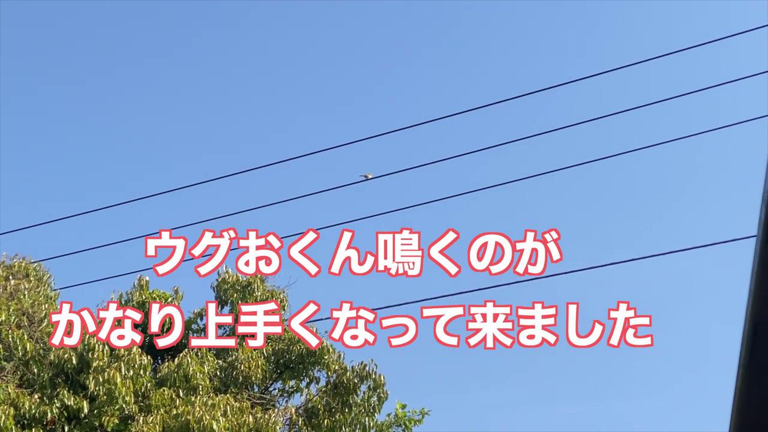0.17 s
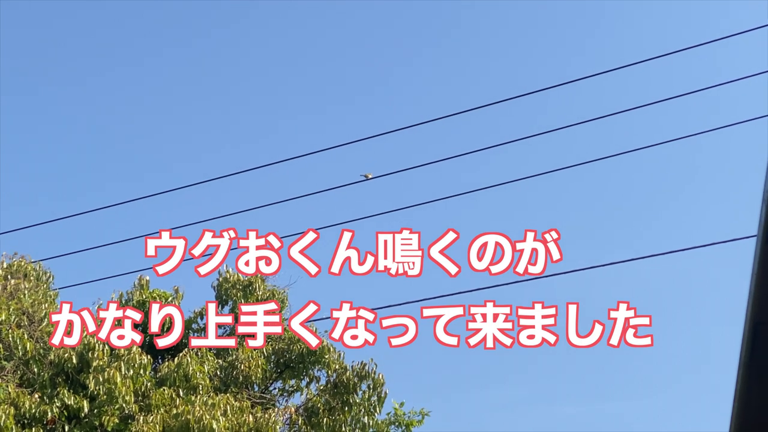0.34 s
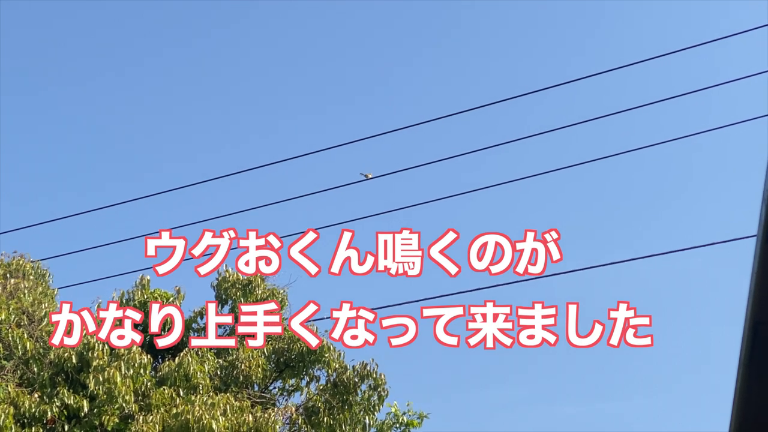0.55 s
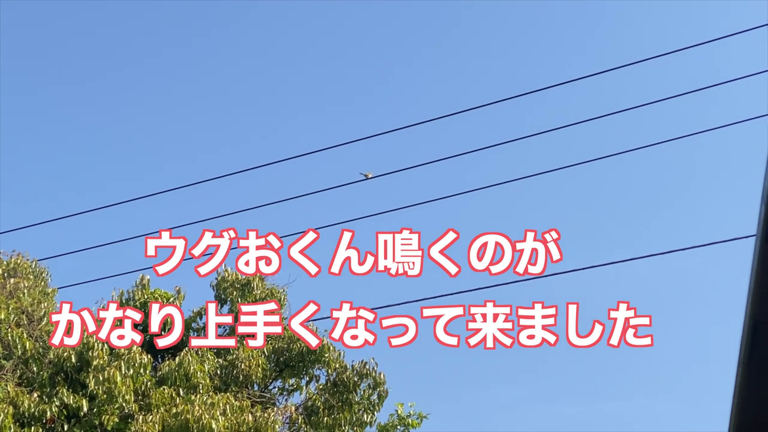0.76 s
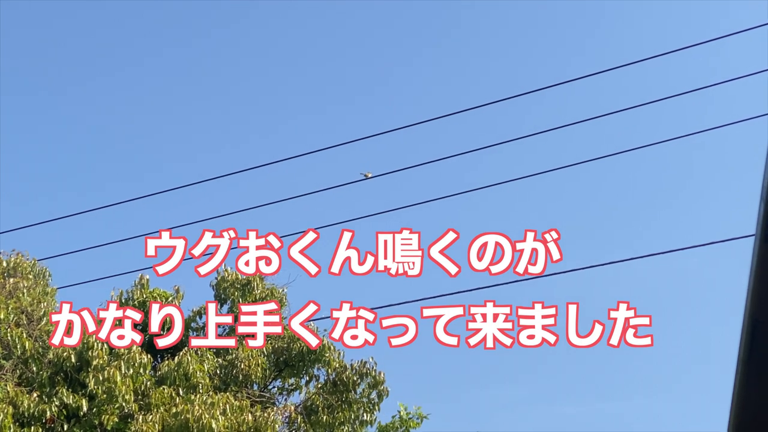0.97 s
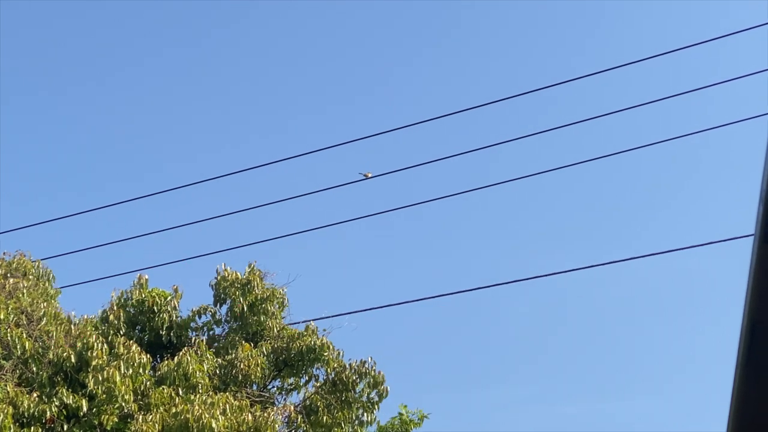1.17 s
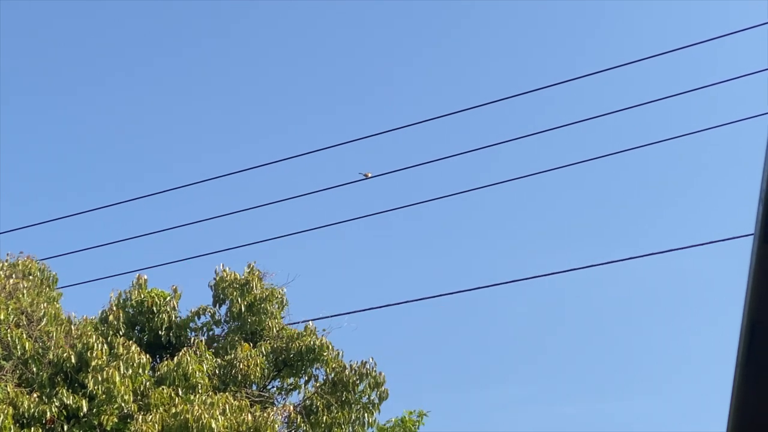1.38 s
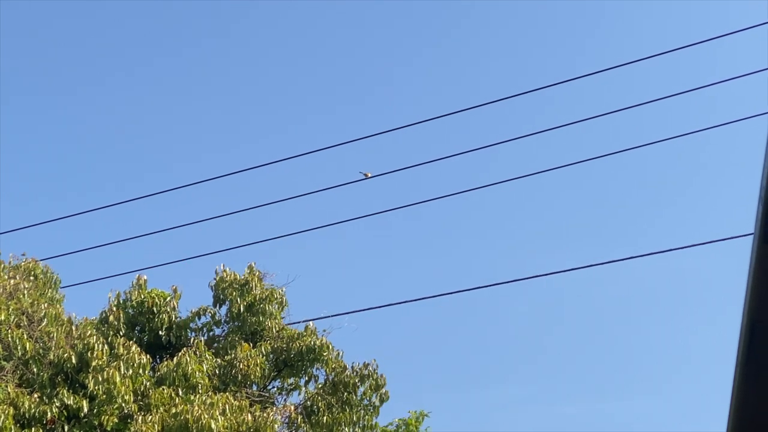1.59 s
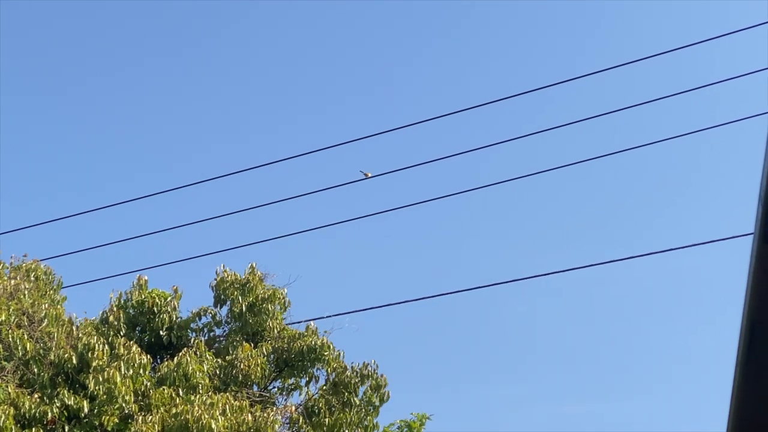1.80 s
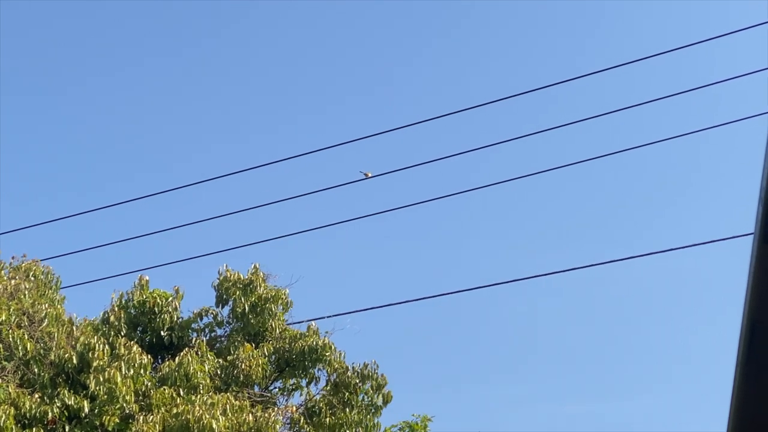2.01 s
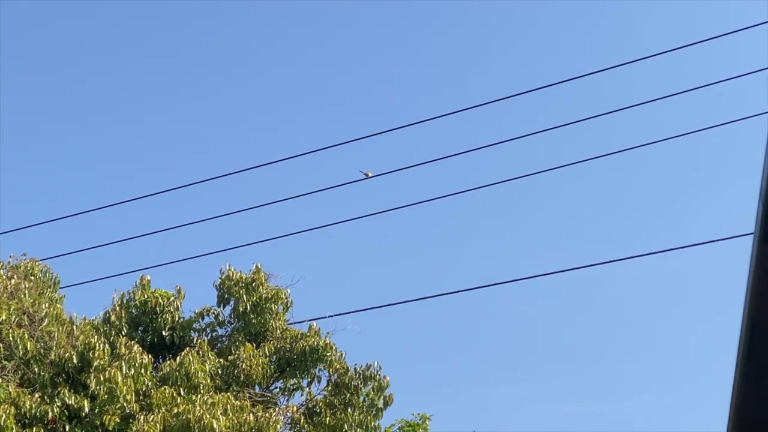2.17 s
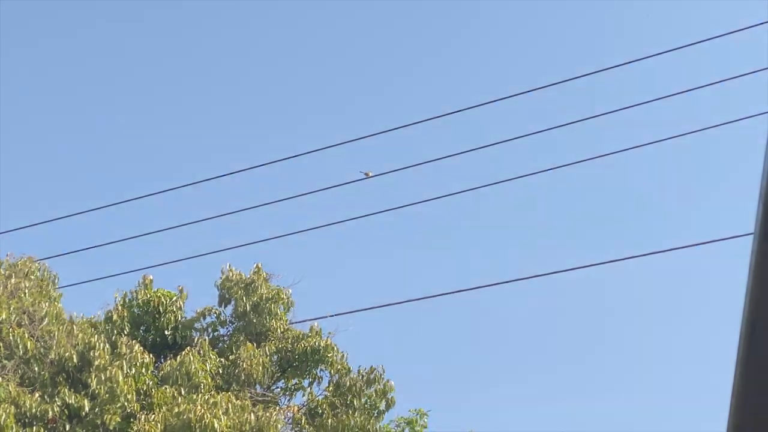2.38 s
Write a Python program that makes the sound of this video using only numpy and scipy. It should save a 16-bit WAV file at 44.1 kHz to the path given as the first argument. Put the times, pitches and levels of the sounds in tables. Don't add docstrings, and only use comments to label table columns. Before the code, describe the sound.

A songbird sings one phrase outdoors. From 0 to 0.75 seconds a pure, low whistle swells, then repeats as five short pulses on nearly one pitch. At about 0.8 a far louder two-part flourish leaps upward, capped by a sharp falling chip near 0.96. Reflections die away; until about 2.4 only faint distant birds, low rumble, soft wind thumps and light leaf hiss remain.

```python
import sys
import numpy as np
from scipy import signal
from scipy.fft import rfft, irfft
from scipy.io import wavfile
from scipy.ndimage import uniform_filter1d

SR = 44100
rng = np.random.default_rng(int(sys.argv[2]) if len(sys.argv) > 2 else 0)


def to_wav(s):
    ch = np.atleast_2d(s).T
    pcm = np.round(np.clip(ch, -1, 1) * 32767)
    wavfile.write(sys.argv[1], SR, pcm.astype(np.int16))


def invert_db(level):
    return 10 ** (np.asarray(level, dtype=float) / 20)


N = 108045

# (time [s], rumble level [dB], gust level [dB], leaf level [dB])
WEATHER = [(0.0, -52, -50.5, -84), (.2, -47.5, -50.5, -84), (0.4, -45.5, -48, -84.5),
           (.6, -53.5, -47.5, -82.5), (0.8, -58, -56.5, -83), (1.0, -57, -56.5, -83),
           (1.22, -56.5, -61, -83), (1.291, -41.5, -54, -82), (1.37, -54, -57.5, -82.5),
           (1.48, -54.5, -54, -82.5), (1.6, -54, -40, -82), (1.72, -53, -44, -81), (1.88, -45, -47, -82),
           (2.02, -50, -47, -81), (2.18, -46.5, -50, -81), (2.3, -62.5, -59, -80.5),
           (2.45, -55, -59.5, -81)]


def evened(x):
    return x / np.sqrt(np.mean(x ** 2) + 1e-20)


def read(points, hz):
    f, value = np.transpose(points)
    return np.interp(np.log(hz + 1), np.log(f + 1), value)


def add(mix, s, sound):
    part = mix[int(round(max(s, 0) * SR)):][:len(sound)]
    part += sound[:len(part)]


def whistle(length, level_db, first_hz, last_hz, bend, swell_db, octave_db, rise_s, fall_s):
    octave_fade_db = 1
    t = np.arange(0, length, 1 / SR)
    u = t / length
    pitch_hz = last_hz + (first_hz - last_hz) * (1 - u) ** bend
    phase = 2 * np.pi * np.cumsum(pitch_hz) / SR
    ramp = np.clip(np.minimum(t / rise_s, (length - t) / fall_s), 0, 1)
    envelope = np.sin(np.pi / 2 * ramp) ** 2 * invert_db(level_db + swell_db(u))
    octave = invert_db(octave_db + octave_fade_db * (u + 0.5)) * np.sin(2 * phase)
    return np.sqrt(2) * envelope * (np.sin(phase) + octave)


def slur(points, overtone_db):
    # (harmonic number [multiple], level [dB])
    overtones = [(2, -42.5), (4, -73), (5, -52), (6, -57.5), (7, -58)]
    beak_hz, beak_width_hz, beak_db = 9160, 260, 19.5
    s, pitch, db = np.transpose(points)
    t = np.arange(s[0], s[-1], 1 / SR)
    hz = uniform_filter1d(np.interp(t, s, pitch), size=90)
    phase = 2 * np.pi * np.cumsum(hz) / SR
    tone = np.sin(phase)
    for k, k_db in overtones:
        lift_db = beak_db / (1 + ((k * hz - beak_hz) / beak_width_hz) ** 2)
        audible = k * hz < 16000
        tone = tone + invert_db(k_db + overtone_db + lift_db) * np.sin(k * phase) * audible
    envelope = uniform_filter1d(np.interp(t, s, invert_db(db)), size=60)
    edges = signal.windows.tukey(len(t), 130 / len(t))
    return s[0], np.sqrt(2) * envelope * tone * edges


def songbird():
    # (start [s], length [s], level [dB], first pitch [Hz], last pitch [Hz])
    pulses = [
        (0.0, 0.18, -44, 952, 964),
        (.211, 0.099, -39.5, 924.4, 983.6),
        (.333, .08, -38, 946, 948),
        (.448, 0.078, -35.5, 960, 951),
        (.56, 0.095, -36.5, 944.6, 948),
        (.682, 0.08, -37.5, 943.6, 944.5),
    ]
    falls_s = [.02, .008, .008, .008, .022, .01]
    # (time [s], pitch [Hz], level [dB])
    arch = [
        (.812, 1400, -65),
        (.82, 1546, -31.5),
        (.83, 1556, -23.5),
        (.84, 1470, -31),
        (.85, 1357, -26.5),
        (.856, 1339, -33.5),
        (.861, 1310, -41),
    ]
    # (time [s], pitch [Hz], level [dB])
    climb = [
        (.862, 1392, -58),
        (.869, 1411, -30),
        (.878, 1563, -24),
        (.89, 1748, -20.5),
        (.902, 1855, -21.5),
        (.914, 1844, -23.5),
        (.921, 1860, -43.5),
        (.926, 1850, -64),
    ]
    # (time [s], pitch [Hz], level [dB])
    chip_path = [
        (.952, 3950, -66),
        (.9545, 3740, -40),
        (.958, 3060, -29),
        (.961, 2670, -26),
        (.964, 2390, -25),
        (.967, 2130, -24),
        (.97, 1930, -27),
        (.973, 1800, -36),
        (.976, 1750, -60),
    ]
    pulse_db, chip_db, chip_overtone_db = 0.2, 2.5, 7.5

    def first_swell(u):
        return 15.5 * (u - 0.7)

    def later_swell(u):
        return -1.5 * (np.sin(np.pi * u) - 0.5)

    out = np.zeros(N)
    for k, (s, *row) in enumerate(pulses):
        swell = later_swell if k else first_swell
        note = whistle(*row, bend=0.61, swell_db=swell, octave_db=-22.5, rise_s=0.008, fall_s=falls_s[k])
        add(out, s, invert_db(pulse_db) * note)
    add(out, *slur(arch, 0))
    add(out, *slur(climb, 0))
    s, chip = slur(chip_path, chip_overtone_db)
    add(out, s, invert_db(chip_db) * chip)
    return out


def noise(spectrum, level_db, patchy_db, size):
    # (frequency [Hz], left-right likeness [0..1])
    likeness = [(60, 0.97), (120, 0.82), (230, 0.89), (440, 0.59), (860, 0.023), (1680, 0.7), (3280, 0.86)]
    # (frequency [Hz], left over right [dB])
    balance = [(60, -2), (230, -1), (860, -0.5), (3280, 0.5)]
    hop = size // 4
    frames, hz = N // hop + 5, np.fft.rfftfreq(size, 1 / SR)
    a, b, c, d, patches = rng.standard_normal((frames, len(hz), 5)).T
    patches = uniform_filter1d(patches, size=5, axis=0)
    patches = evened(uniform_filter1d(patches, size=6, axis=1))
    same = np.clip(read(likeness, hz), -1, 1)[:, None]
    left = a + 1j * b
    right = same * left + np.sqrt(1 - same ** 2) * (c + 1j * d)
    z = np.array([left, right])
    inside = (hz >= spectrum[0][0]) & (hz <= spectrum[-1][0])
    shape = invert_db(read(spectrum, hz)) * inside
    z *= (shape / np.linalg.norm(shape))[:, None]
    z *= invert_db(np.outer([0.5, -0.5], read(balance, hz)))[:, :, None]
    z *= invert_db(level_db(np.arange(frames) * hop / SR, hz[:, None]) + patchy_db * patches)
    return signal.istft(z, nperseg=size, noverlap=size - hop)[1][:, :N]


def town_rumble():
    # (frequency [Hz], density [dB per Hz])
    rumble_spectrum = [(12, -46.5), (25, -36), (35, -12), (52, 13.5), (70, -6), (95, -23.5), (130, -35.5)]
    s, rumble_db, _, _ = np.transpose(WEATHER)
    return noise(rumble_spectrum, lambda t, hz: np.interp(t, s, rumble_db), 0.53, size=2048)


def gusts():
    # (frequency [Hz], density [dB per Hz])
    gust_spectrum = [(50, -26), (85, -27.5), (134, 0.5), (150, -10.5), (184, -12), (247, -9), (318, -13),
                     (377, -22.5), (500, -29), (650, -53.5), (1100, -120)]
    s, _, gust_db, _ = np.transpose(WEATHER)
    return noise(gust_spectrum, lambda t, hz: np.interp(t, s, gust_db), 1.75, size=2048)


def leaf_hiss():
    # (frequency [Hz], density [dB per Hz])
    air_spectrum = [(330, -1), (1000, -1.5), (2000, -14), (4000, -16.5), (7600, -19.5), (8400, -27),
                    (12300, -29), (13100, -38.5)]
    air_db, leaves_mean_db = -54, -81
    treble_hz, low_share, high_share = 5860, 0.037, 3.72
    s, _, _, leaves_db = np.transpose(WEATHER)

    def level_db(t, hz):
        share = low_share + (high_share - low_share) * hz ** 2 / (hz ** 2 + treble_hz ** 2)
        return air_db + share * (np.interp(t, s, leaves_db) - leaves_mean_db)

    return noise(air_spectrum, level_db, 1.7, size=512)


def street(x):
    # (delay [s], level at 1 kHz [dB], level at 3 kHz [dB], left over right [dB])
    echoes = [
        (.0059, -23.5, -1, -2),
        (.0078, -24, -11.5, -12),
        (0.015, -18, -14.5, 5),
        (0.0245, -12.5, -38.5, 5.5),
        (.034, -27.5, -29.5, -3.5),
        (0.044, -27, -19.5, 4),
        (.058, -34, -22.5, 1),
        (.029, -23.5, -31, 7),
        (0.048, -24, -28, -1),
    ]
    # (frequency [Hz], 60 dB decay time [s])
    decay = [(500, 0.94), (1500, 0.34), (2500, 0.26), (4000, 0.42), (9000, 0.18)]
    tail_db, late_db, late_stretch, tail_spread = -12.5, -18.5, 4.25, 1
    tail_bass_db, echo_dull_db = -11, -10
    taps = np.zeros((3, SR))
    at = np.arange(400, SR - 20, 20) + rng.integers(0, 20, (3, (SR - 401) // 20))
    np.put_along_axis(taps, at, rng.choice([-1., 1.], at.shape), 1)
    taps = taps[0] + tail_spread * taps[1:]
    hz, t, z = signal.stft(taps, SR, nperseg=256)
    z = z * invert_db(tail_bass_db * np.clip(2 - hz / 1200, 0, 1))[:, None]
    room = 0
    for db, stretch in ((tail_db, 1), (late_db, late_stretch)):
        fade = invert_db(-60 * t / (read(decay, hz)[:, None] * stretch))
        tail = signal.istft(z * fade, SR, nperseg=256)[1]
        room = room + invert_db(db) * tail / np.linalg.norm(tail[0] + 1e-9)
    for s, low_db, high_db, pan_db in echoes:
        dull_db = high_db + echo_dull_db
        gains_db = np.array([low_db, low_db, (low_db + high_db) / 2, high_db, dull_db, dull_db])
        tap = signal.firwin2(89, [0, 1000, 2000, 2800, 4000, SR / 2], invert_db(gains_db), fs=SR)
        middle = round(s * SR)
        room[:, middle - 44:middle + 45] += tap * invert_db(pan_db * np.array([[0.5], [-0.5]]))
    return signal.fftconvolve(x[None], room, axes=1)[:, :N]


def far_birds():
    # (start [s], length [s], level [dB], first pitch [Hz], last pitch [Hz])
    clear = [
        (.01, .1, -66, 1455, 1430),
        (.468, .105, -58, 3375, 3350),
        (.575, .055, -65, 3350, 3345),
        (.82, .125, -69, 5080, 5050),
        (1.11, .075, -62, 3450, 3250),
        (2.178, .09, -65, 3570, 3500),
        (2.35, .12, -66, 3950, 5450),
        (.825, .04, -60, 2200, 2050),
    ]
    # (time [s], pitch [Hz], level [dB])
    dips = [
        [(.582, 4300, -80), (.6, 4050, -63), (.621, 3950, -51), (.632, 3850, -62), (.643, 3920, -54),
         (.66, 3960, -63), (.67, 3950, -80)],
        [(.676, 4320, -80), (.685, 4240, -67), (.707, 3990, -61), (.715, 3920, -63), (.722, 3850, -80)],
    ]
    # (time [s], pitch [Hz], level [dB])
    far_wall = [
        (1.318, 3900, -85),
        (1.323, 3500, -68),
        (1.328, 3050, -62),
        (1.333, 2850, -66),
        (1.338, 2750, -85),
    ]
    # (start [s], length [s], level [dB],
    # first pitch [Hz], last pitch [Hz])
    blurred = [
        (.1, .08, -63, 1400, 1280),
        (1.2, .09, -60, 1820, 1850),
        (1.2, .08, -70, 3350, 3350),
        (1.265, .045, -66, 3550, 3500),
        (1.33, .28, -72, 3200, 3600),
        (1.38, .08, -67, 3400, 3650),
        (1.51, .065, -66, 3800, 3350),
        (1.77, .07, -68, 2400, 2420),
        (1.93, .04, -68, 2400, 2450),
        (1.99, .13, -72, 2700, 2600),
    ]
    far_db, blurred_db, blur_s, far_flutter = -1.2, 1.5, 0.0041, 0.4
    bend, edge_s = 1.1, 0.025

    def swell(u):
        return 5 * (np.sin(np.pi * u) - 0.6)

    out, blur = np.zeros(N), np.zeros(N)
    for s, *row in clear:
        add(out, s, whistle(*row, bend, swell, -43.0, edge_s, edge_s))
    for note in dips + [far_wall]:
        add(out, *slur(note, -26.0))
    for s, *row in blurred:
        add(blur, s, whistle(*row, bend, swell, -43.5, edge_s, edge_s))
    flutter = signal.oaconvolve(rng.standard_normal(N), np.hanning(int(blur_s * SR)), "same")
    flutter = evened(flutter)
    return invert_db(far_db) * out * (1 + far_flutter * flutter) + invert_db(blurred_db) * flutter * blur


def ticks():
    # (time [s], level [dB])
    tick_times = [
        (0.154, -52.5),
        (0.223, -54),
        (0.288, -60),
        (0.399, -53),
        (0.624, -50.5),
        (0.716, -48.5),
    ]
    tick_hz, tick_width_hz, tick_s = 1400, 490, 0.007
    out, t = np.zeros(N), np.arange(-500, 500) / SR
    band = signal.butter(2, [tick_hz - tick_width_hz / 2, tick_hz + tick_width_hz / 2], "band", fs=SR)
    for s, db in tick_times:
        grain = evened(signal.lfilter(*band, rng.standard_normal(1000)))
        add(out, s + t[0], invert_db(db) * grain * np.exp(-(t / tick_s) ** 2))
    return out


def rustles():
    # (centre [s], length [s], level [dB])
    bursts = [(0.584, 0.022, -85.5), (.86, 0.071, -81.5), (0.927, 0.049, -68), (.97, .03, -72),
              (1.285, .03, -76), (1.65, .02, -72.5), (1.715, 0.078, -79.5), (1.829, .03, -87),
              (1.91, .04, -82.5), (2.017, .02, -83.5), (2.126, .08, -77), (2.2, .09, -82.5),
              (2.31, .14, -76), (2.421, 0.088, -80)]
    # (frequency [Hz], density [dB per Hz])
    rustle_spectrum = [(7000, -12.5), (9000, 7), (12000, -1.5), (14600, 0), (15700, -15)]
    rustle_db = -0.5
    s, length, db = np.transpose(bursts)

    def level_db(t, hz):
        power = invert_db(2 * db) * np.exp(-(2 * (t[:, None] - s) / length) ** 4)
        return rustle_db + 10 * np.log10(power.sum(1) + 1e-14)

    return noise(rustle_spectrum, level_db, 1.5, size=256)


def puff():
    puff_s, puff_length_s, puff_db, puff_from_hz = 0.964, 0.006, -57, 5000
    t = np.arange(N) / SR
    high_pass = signal.butter(2, puff_from_hz, "high", fs=SR)
    air = signal.lfilter(*high_pass, rng.standard_normal(N))
    return invert_db(puff_db) * air * np.exp(-((t - puff_s) / puff_length_s) ** 2)


def scene():
    far_wet_db = -11
    near, far = songbird() + ticks() + puff(), far_birds()
    direct = near * invert_db(np.array([[-0.4], [0.4]]))
    weather = town_rumble() + gusts() + leaf_hiss() + rustles()
    return direct + far + street(near + invert_db(far_wet_db) * far) + weather


def ports(x):
    # (low edge [Hz], high edge [Hz], side over mid [dB])
    port_bands = [(800, 1100, -12), (2500, 5300, -11), (5650, 6400, -9), (7950, 10400, 2),
                  (11700, 14700, 5)]
    wide_below_hz, wide_above_db, low_cut_hz = 1800, -8.5, 38
    dull_from_hz, dull_to_hz, dull_db, top_db = 12950, 14000, -14, 4
    hz = np.fft.rfftfreq(N, 1 / SR)
    mid, side = rfft(x[0] + x[1]) / 2, rfft(x[0] - x[1]) / 2
    side = side * np.where(hz < wide_below_hz, 1, invert_db(wide_above_db) * (hz < port_bands[1][1]))
    quadrature = sum(invert_db(db) * (hz > lo) * (hz < hi) for lo, hi, db in port_bands)
    side = side + 1j * mid * quadrature
    corners_hz = [dull_from_hz, dull_from_hz + 100, dull_to_hz, dull_to_hz + 100]
    mid = mid * invert_db(np.interp(hz, corners_hz, [0, dull_db, dull_db, top_db]))
    low_cut = 1 + (low_cut_hz / (hz + 1)) ** 6
    return irfft(np.array([mid + side, mid - side]) / low_cut, N)


def low_pass(x):
    return signal.sosfilt(signal.butter(12, 15700, fs=SR, output="sos"), x)


def record(dry):
    duck_from_db, duck_share, recover_db_per_s = -32.5, 0.11, 29
    power = abs(uniform_filter1d((dry ** 2).mean(0), size=800))
    power_db = 10 * np.log10(power + 1e-12)
    fall = np.arange(N) * recover_db_per_s / SR
    held_db = np.maximum.accumulate(power_db + fall) - fall
    over_db = np.maximum(held_db - duck_from_db, 0)
    ducked = ports(dry) / invert_db(duck_share * uniform_filter1d(over_db, size=400))
    return low_pass(ducked)


dry = scene()
out = record(dry)
to_wav(out)
```